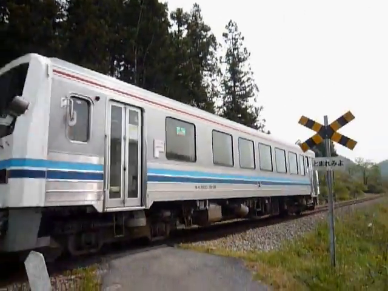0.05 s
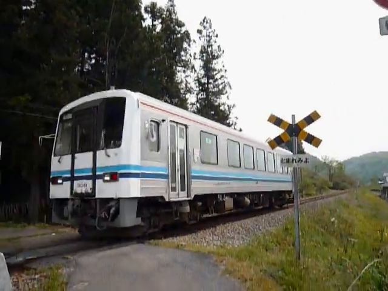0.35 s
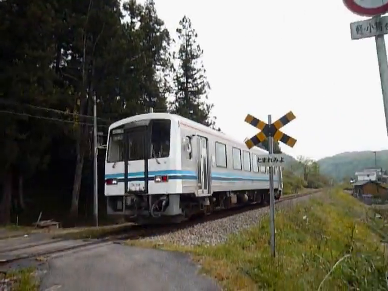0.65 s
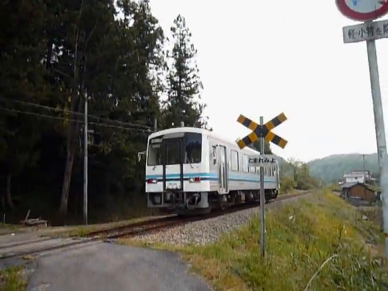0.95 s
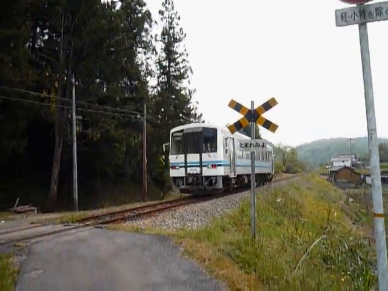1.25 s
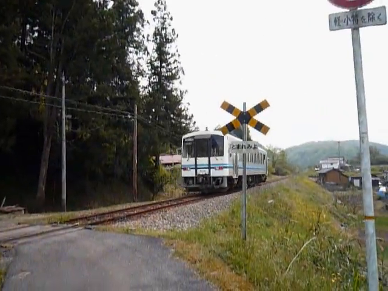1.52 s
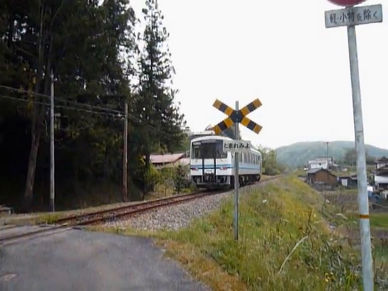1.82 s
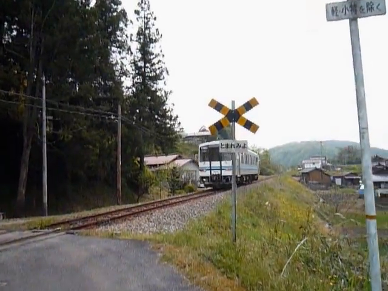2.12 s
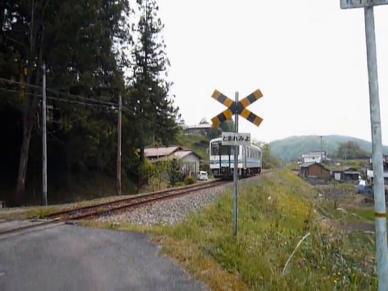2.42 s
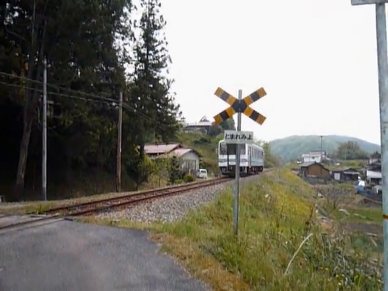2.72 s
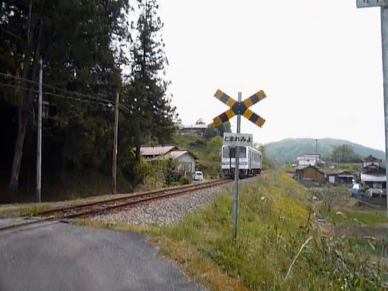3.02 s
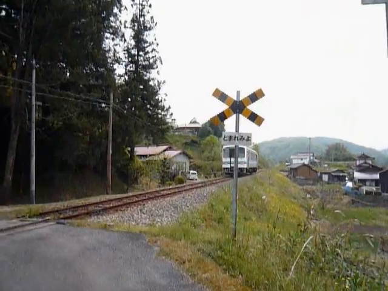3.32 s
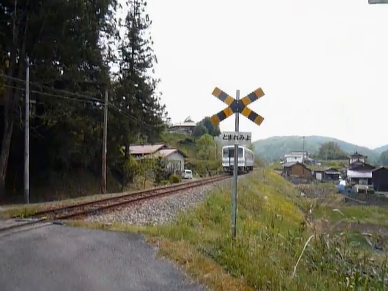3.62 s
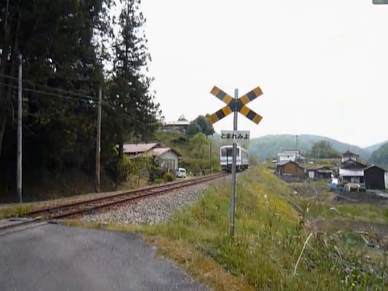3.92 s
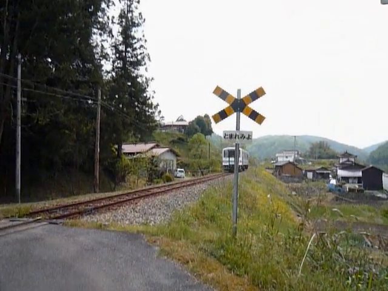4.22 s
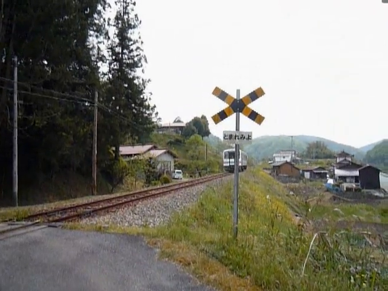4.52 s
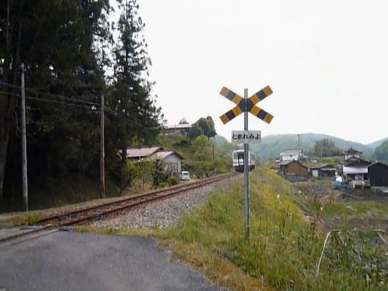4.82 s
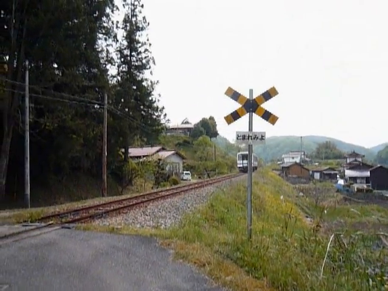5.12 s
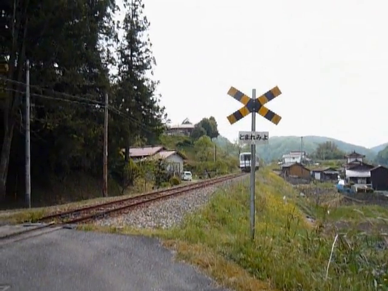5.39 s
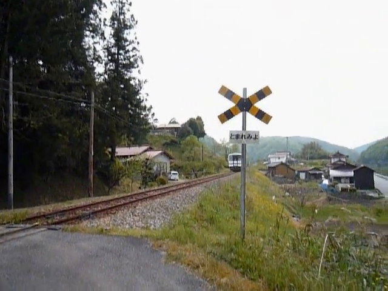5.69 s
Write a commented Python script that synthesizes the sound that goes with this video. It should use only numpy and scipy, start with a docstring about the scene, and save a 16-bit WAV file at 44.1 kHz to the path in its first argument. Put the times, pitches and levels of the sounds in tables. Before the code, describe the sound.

At a country level crossing, a diesel railcar rumbles past at close range and heads down the line. Wheels ring and clack and gears whine at first, then fade, leaving a low, booming engine throb that gathers speed as it grows more distant. Late on come two nearby knocks and a few soft bird chirps, just as the drone drops away. Everything sounds slightly muffled, over light microphone hiss.

```python
"""Diesel railcar pulling away

A railcar leaves a rural crossing and recedes down the line. Its six-cylinder engine gathers speed and
throbs once per cycle; rising harmonics boom in the silencer's resonances until the driver eases off.
Gears whine, and the wheels roar, ring and clack on rail joints. Two dull knocks sound nearby and a small
bird chirps, all heard through a dull microphone with a faint hiss."""
import sys
import numpy as np
from scipy import signal
from scipy.fft import rfft, irfft, next_fast_len
from scipy.io import wavfile

SR = 44100
rng = np.random.default_rng(int(sys.argv[2]) if len(sys.argv) > 2 else 0)


def to_wav(sig):
    """Store sig (one row per channel, or 1-D mono) as 16-bit WAV at the path in sys.argv[1].

    Samples outside -1..1 are clipped; the rate is SR.
    """
    pcm = np.clip(np.atleast_2d(sig), -1, 1) * 32767
    pcm = np.round(pcm).astype(np.int16)
    wavfile.write(sys.argv[1], SR, pcm.T)  # frames by channels


N = 253575
TIME = np.arange(N) / SR

# crankshaft speed: t/s, speed/rpm
ENGINE_SPEED = [(0, 1438), (1.34, 1537), (2.44, 1674.7), (3.45, 1711.8), (5.75, 1730.5)]
# strong harmonics of the engine cycle: order, base level/dB, loss per distance doubling/dB, screening/dB
STRONG_HARMONICS = [(6, -27, 6.5, 3.5), (9, -29, 3.5, 5), (12, -43.5, 1.3, 11), (13, -43.5, 5, 16),
                    (14, -49.5, 3, 7), (15, -42.5, 3, 3.5)]
# weak harmonics: order, level/dB
WEAK_HARMONICS = [(5, -51), (7, -58), (8, -64.5), (10, -47), (11, -76), (16, -68.5)]
# silencer resonances and one notch: f/Hz, bandwidth/Hz, gain/dB
SILENCER_BANDS = [(114.2, 14, 7), (156.26, 14.15, 23), (181.4, 28.9, 21), (181.7, 7.5, 5), (219, 6, -18)]
# spectra of the exhaust's gas noise and low grumble: f/Hz, relative level/dB
PUFFING_SPECTRUM = [(110, -36), (145, -3), (178, 6), (200, -6), (240, -28)]
GRUMBLE_SPECTRUM = [(55, -31), (85, -9.5), (115, 0.5), (150, -13.5), (220, -29)]
# transmission, underfloor fan and pump:
# starting f/Hz, share of the engine's rise, level/dB, hold/s, fade/(dB/s), flutter/dB, relative wobble
MACHINE_TONES = [(734, .54, -27.5, .95, 13, 3, .003), (256, 0.24, -30.5, 0.25, 23, 1, 0.0012),
                 (515, .4, -33, 0.23, 31, 1.5, .004)]
# spectra of underfloor rumble, wheel roar, diesel clatter and hiss: f/Hz, relative level/dB
RUMBLE_SPECTRUM = [(25, -13), (55, -16.5), (90, -8.5), (130, -2), (175, -0.5), (230, 0), (340, -2.5),
                   (450, -3.5), (600, -5.5), (900, -39)]
ROAR_SPECTRUM = [(300, -33), (490, -12), (555, -0.5), (620, -3.5), (690, 7), (740, 0.5), (850, 2.5),
                 (980, -0.5), (1120, 0.5), (1280, -3.5), (1450, -11), (1750, -13.5), (2400, -64)]
CLATTER_SPECTRUM = [(1000, -37), (1450, 1), (1680, -1.5), (1850, 3), (2020, 1.5), (2180, -0.5),
                    (2380, -11.5), (3000, -22)]
HISS_SPECTRUM = [(1900, -43), (2400, -1.5), (2600, -1), (2950, 0.5), (3250, 3.5), (3600, 0), (4000, -0.5),
                 (4400, -4.5), (5000, -18)]
# wheel and underframe modes: f/Hz, bandwidth/Hz, relative level/dB
WHEEL_RESONANCES = [(322, 26, -3), (962, 73, 1), (1108, 150, 2.5), (1437, 150, 2.5), (2028, 82, -2),
                    (2200, 250, -1)]
# wheels striking rail joints: t/s, level before filtering/dB, f/Hz, rattle decay time/s
JOINT_IMPACTS = [(.405, -21, 340, .07), (.614, -12.5, 1000, .014), (.615, -19.5, 3100, .022),
                 (.622, -18, 420, .025), (.643, -17, 700, .008), (2.694, -12, 1200, .006),
                 (2.704, -17, 620, .02), (2.747, -24, 260, .035), (3.743, -16.5, 700, .004)]
# pulses that make up the two knocks: t/s, peak level/dB, f/Hz, rise time/s
KNOCK_PULSES = [(4.607, -19, 1110, .004), (4.615, -9, 620, 0.0028), (4.6225, -13.5, 816, 0.00436),
                (5.2133, -10, 193, 0.007), (5.2165, -19, 400, 0.0031)]
# bird notes: t/s, duration/s, starting f/Hz, final f/Hz, peak level/dB
BIRD_NOTES = [(5.209, 0.036, 2970, 2840, -37), (5.32, 0.06, 3190, 3050, -33), (5.42, .05, 2730, 2530, -39),
              (5.488, 0.03, 3150, 2980, -33.5), (5.567, .09, 2760, 2720, -40.5)]
# spectrum of the microphone's hiss: f/Hz, relative level/dB
MIC_HISS_SPECTRUM = [(20, -5), (4500, 0), (7000, -1), (10300, -1.5), (11000, -13)]

START_DISTANCE_M, SPEED_M_PER_S = 14, 15.4
SCREEN_CLEARS_S = 0.94  # the body screens the exhaust while the car is alongside
OFF_DECK_S, OFF_DECK_TAKES_S, DECK_BOOM_DB = 0.66, 0.18, 5  # the wheels leave the booming crossing deck
PAST_TREES_S, PAST_TREES_TAKES_S = 2.82, 0.26  # the car clears a reflecting wall of trees
EASE_S, EASE_TAKES_S = 5.47, 0.14  # the driver eases off
DRONE_EASE_DB, PUFFING_EASE_DB, RUNNING_EASE_DB_PER_S = 32, 4, 7
GRUMBLE_STEADY_DB, GRUMBLE_SWELL_DB, GRUMBLE_WIDTH_S = -53.5, -41.5, .22
DIP_S, DIP_WIDTH_S, DIP_DB, DIP_ABOVE_ORDER = 0.38, 0.19, 13, 13.5  # the top of the drone dips briefly
NOTCH_SPACING_HZ, NOTCH_SLIDE_HZ, ECHO_DB = 918, 66, -18.5  # slide per doubling of distance


def exhaust(cycles, cycle_hz, waver_db, weak_waver_db):
    """Beating: unequal cylinders sound harmonics of the cycle, and neighbours beat into a throb."""
    angle = 2 * np.pi * cycles
    eased = transition(EASE_S, EASE_TAKES_S)
    screened = np.maximum(1 - TIME / SCREEN_CLEARS_S, 0)
    dip_db = DIP_DB * np.exp(-((TIME - DIP_S) / DIP_WIDTH_S) ** 2)
    harmonics = []
    for order, db, loss_db, screen_db in STRONG_HARMONICS:
        level_db = receding(db, loss_db) + silencer_db(order * cycle_hz)
        level_db -= screen_db * screened + dip_db * (order > DIP_ABOVE_ORDER)
        harmonics.append(from_db(level_db + waver_db * drift(7.4)) * np.cos(order * angle))
    # the firing harmonic lies below the silencer's resonance and leaves it inverted
    drone = from_db(-DRONE_EASE_DB * eased) * (sum(harmonics[1:]) - harmonics[0])
    weak = np.zeros(N)
    for order, db in WEAK_HARMONICS:
        gain = from_db(db + weak_waver_db * drift(3.1))
        weak += gain * np.cos(order * angle + 2 * np.pi * rng.random())
    puffing = from_db(receding(db=-31.5, loss_db=3.5)) * coloured(white(), PUFFING_SPECTRUM)
    swell = np.exp(-((TIME - EASE_S) / GRUMBLE_WIDTH_S) ** 2)
    grumble_gain = from_db(GRUMBLE_STEADY_DB) + from_db(GRUMBLE_SWELL_DB) * swell
    grumble = grumble_gain * coloured(white(), GRUMBLE_SPECTRUM)
    return drone + from_db(-PUFFING_EASE_DB * eased ** 2) * (weak + puffing) + grumble


def silencer_db(hz):
    """Resonance: a harmonic booms as its frequency passes through a peak of the silencer's gain."""
    return sum(db / (1 + (2 * (hz - centre) / width) ** 2) for centre, width, db in SILENCER_BANDS)


def whine(rpm):
    """Periodic forcing: rotating parts give tones that climb with the engine and fade as the car leaves."""
    out = np.zeros(N)
    for start_hz, share, db, hold_s, fade_db_per_s, flutter_db, wobble in MACHINE_TONES:
        hz = start_hz * (1 + share * (rpm / rpm[0] - 1))
        turns = np.cumsum(hz * (1 + wobble * drift(10.6))) / SR
        level_db = db - fade_db_per_s * since(hold_s) + flutter_db * drift(5.9)
        out += from_db(level_db) * np.sqrt(2) * np.sin(2 * np.pi * turns)
    return out


def running_noise(cycles):
    """Attenuation with distance: rumble, roar, clatter and hiss each fade at their own rate."""
    on_deck = 1 - transition(OFF_DECK_S, OFF_DECK_TAKES_S)
    rumble_db = receding(db=-32.5, loss_db=1.19, trees_db=2.06) + DECK_BOOM_DB * on_deck + drift(9.3)
    rumble = coloured(machine_noise(cycles, repeat=0.28, pulsing=0.069), RUMBLE_SPECTRUM)
    roar_db = receding(db=-24.5, loss_db=1.48, trees_db=3) + 0.68 * drift(14)
    roar = coloured(machine_noise(cycles, repeat=0.3, pulsing=0.082), ROAR_SPECTRUM)
    clatter_db = receding(db=-33, loss_db=1.6, trees_db=4) + 0.12 * drift(10)
    clatter = coloured(machine_noise(cycles, repeat=.15, pulsing=0.06), CLATTER_SPECTRUM)
    hiss_db = receding(db=-34, loss_db=0.91, trees_db=3)
    hiss = coloured(white(), HISS_SPECTRUM)
    low = from_db(rumble_db) * rumble + from_db(roar_db) * roar
    treble = from_db(clatter_db) * clatter + from_db(hiss_db) * hiss
    return from_db(-RUNNING_EASE_DB_PER_S * since(EASE_S)) * (low + track_echo(treble))


def machine_noise(cycles, repeat, pulsing):
    """Cyclostationary noise: a share repeats every engine cycle, and all swells at the six firings."""
    pattern = rng.standard_normal(1024)
    periodic = np.interp(cycles % 1 * len(pattern), np.arange(len(pattern)), pattern)
    periodic *= np.sqrt(len(pattern) * cycles[-1] / N)  # same power per Hz as white noise
    noise = np.sqrt(repeat) * periodic + np.sqrt(1 - repeat) * white()
    return noise * (1 + pulsing * np.cos(2 * np.pi * 6 * cycles))


def track_echo(x):
    """Comb filtering: an inverted echo off the track bed cuts notches that slide down with distance."""
    lag_s = 1 / (NOTCH_SPACING_HZ - NOTCH_SLIDE_HZ * doublings())
    return x - from_db(ECHO_DB) * np.interp(TIME - lag_s, TIME, x)


def wheel_ring(level_db, hold_s, fade_db_per_s):
    """Random excitation: rough rail keeps wheel and underframe modes ringing, heard only close by."""
    modes = np.zeros(N)
    for hz, width, db in WHEEL_RESONANCES:
        modes += from_db(db) * rms_one(band_pass(white(), hz - width / 2, hz + width / 2))
    return from_db(level_db - fade_db_per_s * since(hold_s)) * rms_one(modes)


def clacks(rattle):
    """Impact excitation: a wheel drops over a joint, with one sharp ring and a rattle of rail and bogie."""
    out = np.zeros(N)
    for start_s, db, hz, decay_s in JOINT_IMPACTS:
        age = since(start_s)
        envelope = (age > 0) * np.exp(-np.minimum(age / decay_s, 40))
        ring = envelope ** 2 * np.sin(2 * np.pi * hz * age)
        shake = rattle * np.sqrt(SR / hz) * white() * envelope
        out += from_db(db) * band_pass(ring + shake, hz * .5, hz * 1.5)
    return out


def knocks(sharpness=6):
    """Heavy damping: the tone of a soft blow swells and dies within a few cycles."""
    out = np.zeros(N)
    for start_s, db, hz, rise_s in KNOCK_PULSES:
        rises = np.clip((TIME - start_s) / rise_s, 0, 10)
        envelope = (rises * np.exp(1 - rises)) ** sharpness
        out += from_db(db) * envelope * np.cos(2 * np.pi * hz * rise_s * (rises - 1))
    return out


def bird():
    """Frequency modulation: each short whistle is a pure tone gliding downward."""
    out = np.zeros(N)
    for start_s, length_s, start_hz, end_hz, db in BIRD_NOTES:
        progress = np.clip((TIME - start_s) / length_s, 0, 1)
        turns = np.cumsum(start_hz + (end_hz - start_hz) * progress) / SR
        out += from_db(db) * np.sin(np.pi * progress) * np.sin(2 * np.pi * turns)
    return out


def receding(db, loss_db, trees_db=0):
    """Spreading loss: the level falls loss_db per doubling of distance, and trees_db past the trees."""
    return db - loss_db * doublings() - trees_db * transition(PAST_TREES_S, PAST_TREES_TAKES_S)


def doublings():
    """Uniform motion: how many times the car's distance has doubled."""
    return np.log2(1 + SPEED_M_PER_S * TIME / START_DISTANCE_M)


def transition(at_s, takes_s):
    """A smooth step from 0 to 1, centred on at_s."""
    return .5 + .5 * np.tanh(2 * (TIME - at_s) / takes_s)


def since(start_s):
    """Seconds elapsed after start_s; zero before."""
    return np.maximum(TIME - start_s, 0)


def drift(rate_hz):
    """Random fluctuation: noise of unit rms, low-passed at rate_hz."""
    hop, settle = 40, 2000
    pole = np.exp(-2 * np.pi * rate_hz * hop / SR)
    noise = rng.standard_normal(N // hop + settle + 2)
    slow = signal.lfilter([1], [1, -2 * pole, pole * pole], noise)[settle:]
    return np.interp(np.arange(N) / hop, np.arange(len(slow)), rms_one(slow))


def coloured(x, spectrum):
    """Spectral shaping by (f/Hz, level/dB) points, scaled to unit rms."""
    hz, db = np.transpose(spectrum)
    size = next_fast_len(N)
    bin_hz = np.maximum(np.fft.rfftfreq(size, 1 / SR), 1)
    gain = from_db(np.interp(np.log(bin_hz), np.log(hz), db, left=-np.inf, right=-np.inf))
    return rms_one(irfft(rfft(x, size) * gain, size)[:N])


def band_pass(x, low_hz, high_hz):
    """Band-pass filtering between two half-power points."""
    return signal.sosfilt(signal.butter(2, [low_hz, high_hz], "band", fs=SR, output="sos"), x)


def white():
    """White noise: equal power per Hz."""
    return rng.standard_normal(N)


def from_db(db):
    """Decibels to amplitude ratio."""
    return 10 ** (np.asarray(db) / 20)


def rms_one(x):
    """Normalisation to unit rms."""
    return x / np.sqrt(np.mean(x ** 2) + 1e-20)


def scene():
    """Superposition: the railcar and the small sounds around the crossing add in one channel."""
    rpm = np.interp(TIME, *np.transpose(ENGINE_SPEED))
    cycle_hz = rpm / (2 * 60)  # a four-stroke cycle takes two turns
    cycles = np.cumsum(cycle_hz) / SR
    engine = exhaust(cycles, cycle_hz, waver_db=0.86, weak_waver_db=5.5) + whine(rpm)
    wheels = wheel_ring(level_db=-28, hold_s=0.52, fade_db_per_s=10) + clacks(rattle=0.29)
    return (engine + wheels + running_noise(cycles) + knocks() + bird())[None]


def record(dry):
    """Band limiting: a dull microphone, then hiss, a steep top cut and an offset from the electronics."""
    mic_top_hz, cutoff_hz, hiss_db, offset = 3570, 10900, -51.5, -.048
    dull = signal.sosfilt(signal.butter(10, mic_top_hz, fs=SR, output="sos"), dry)
    hiss = from_db(hiss_db) * coloured(white(), MIC_HISS_SPECTRUM)
    top_cut = signal.ellip(10, .1, 90, cutoff_hz, fs=SR, output="sos")
    return signal.sosfilt(top_cut, dull + hiss) + offset


dry = scene()
out = record(dry)
to_wav(out)
```